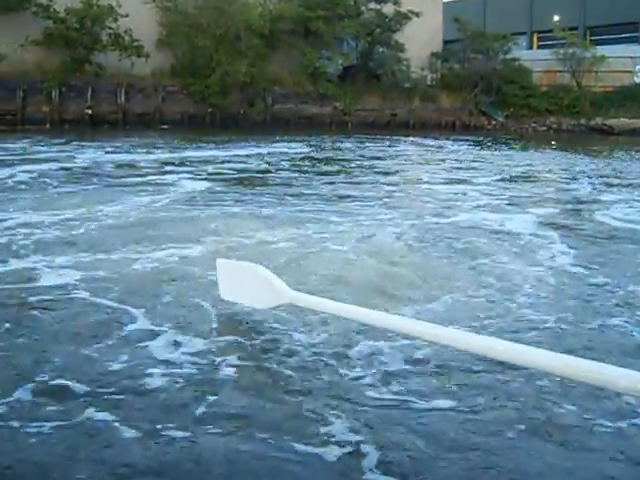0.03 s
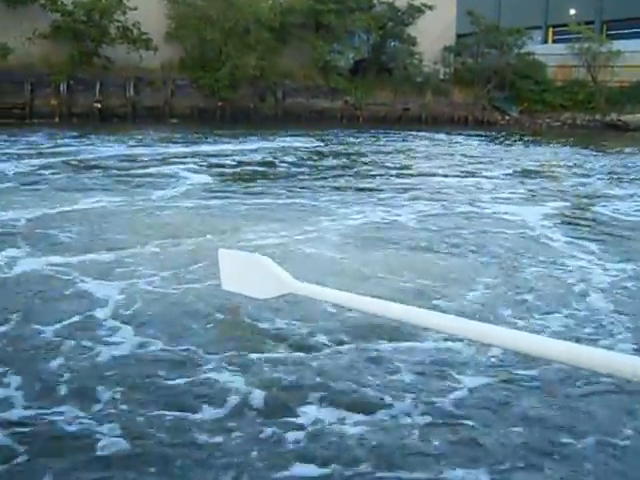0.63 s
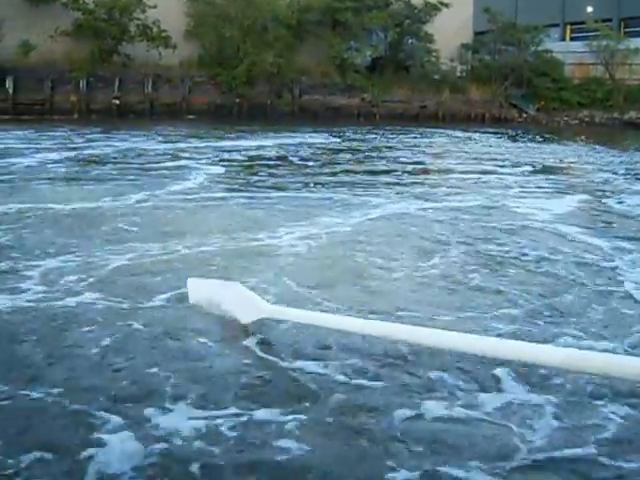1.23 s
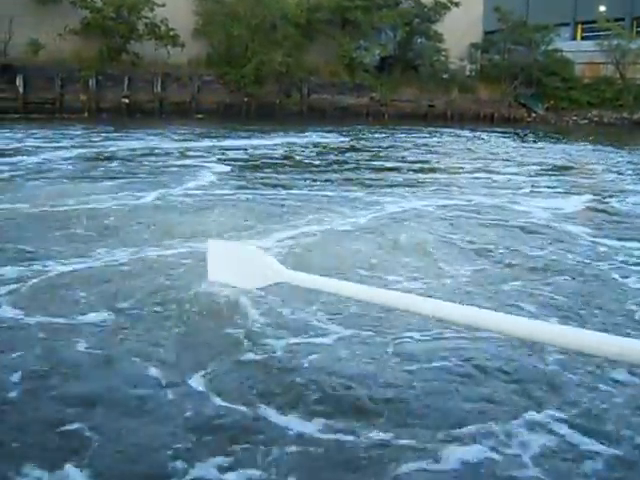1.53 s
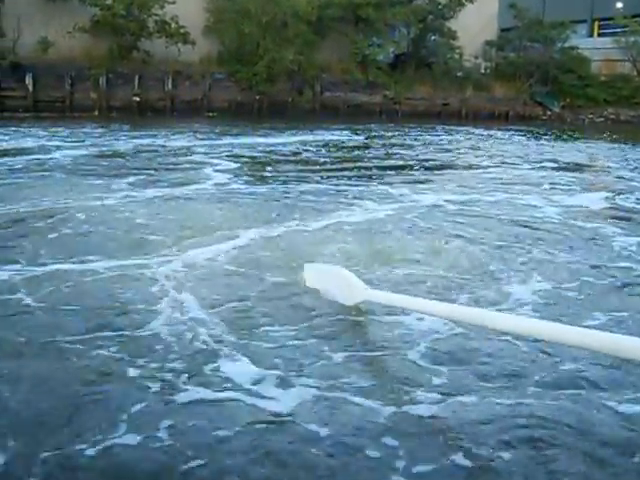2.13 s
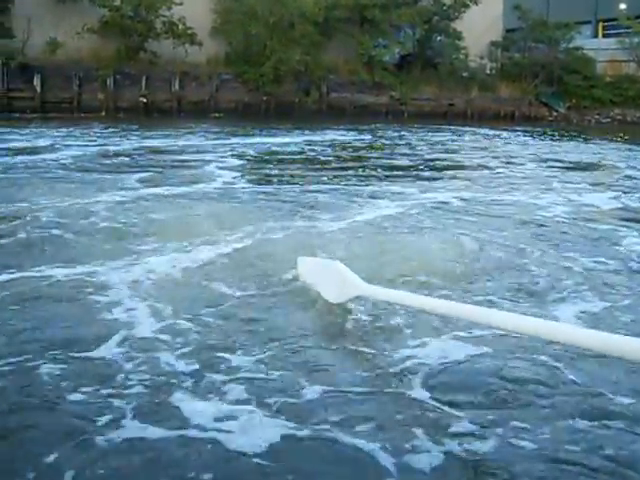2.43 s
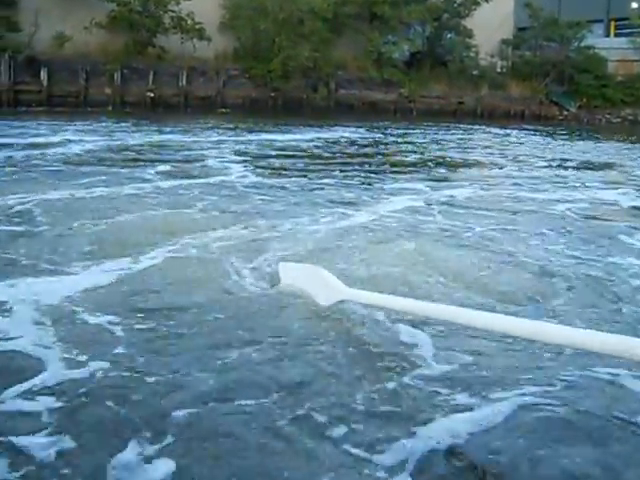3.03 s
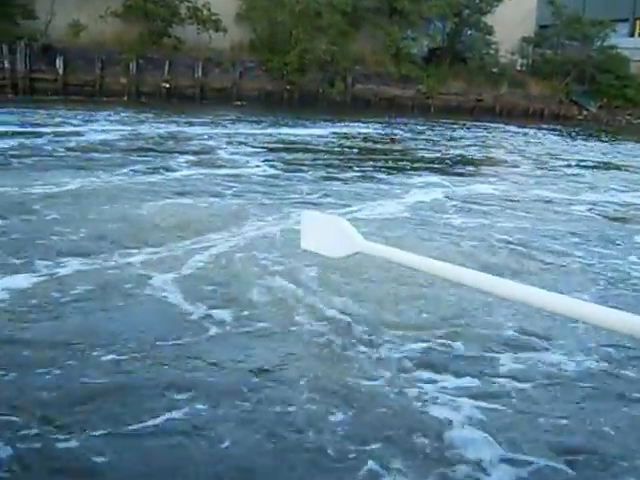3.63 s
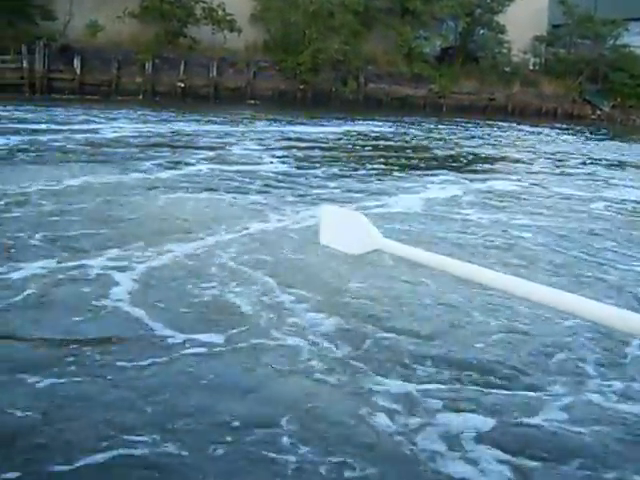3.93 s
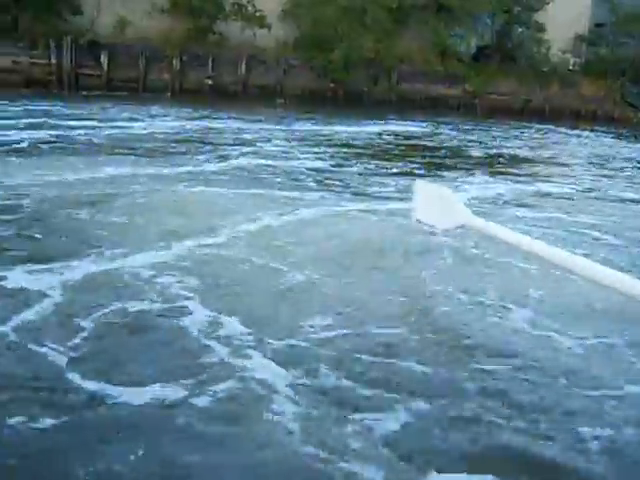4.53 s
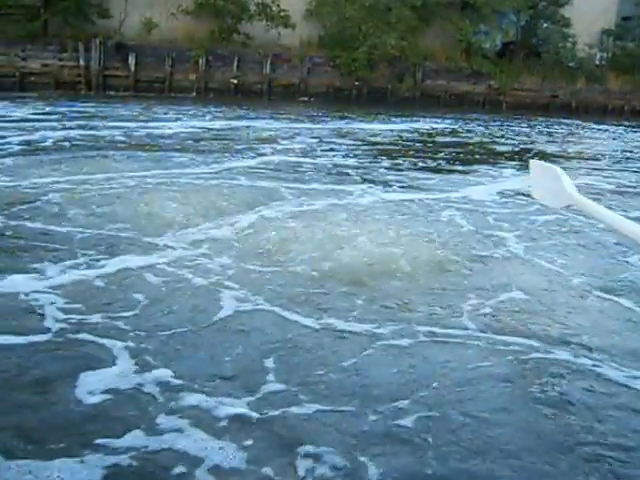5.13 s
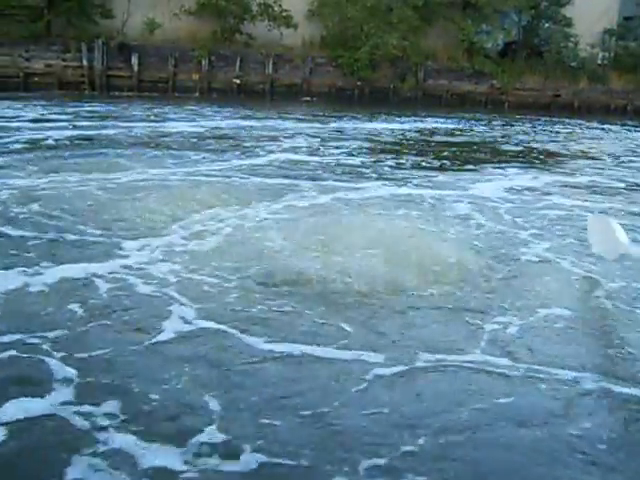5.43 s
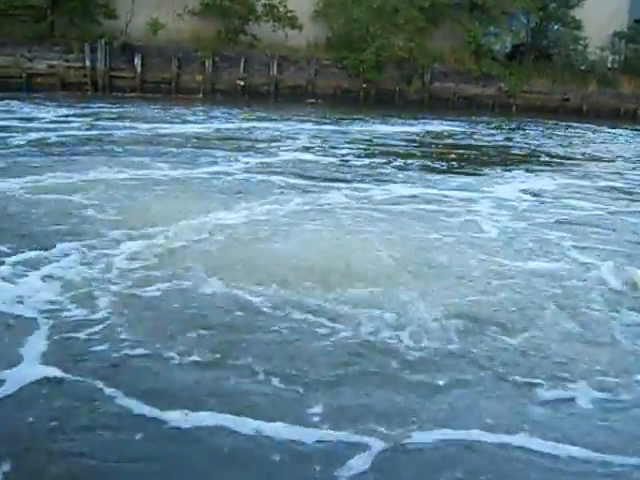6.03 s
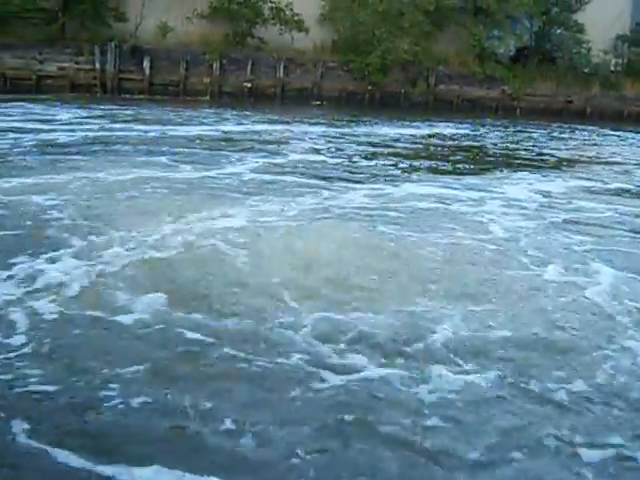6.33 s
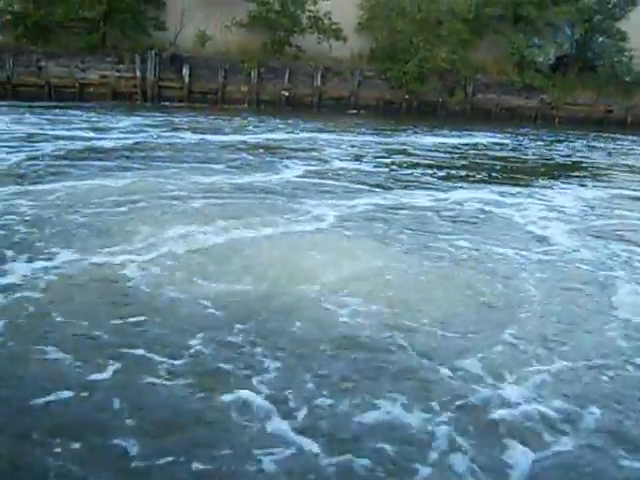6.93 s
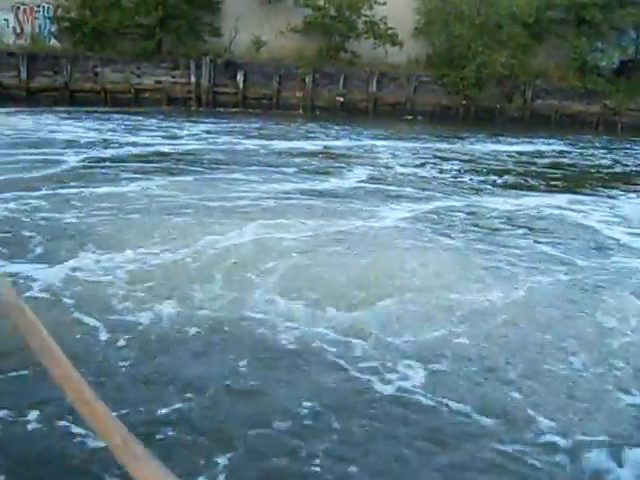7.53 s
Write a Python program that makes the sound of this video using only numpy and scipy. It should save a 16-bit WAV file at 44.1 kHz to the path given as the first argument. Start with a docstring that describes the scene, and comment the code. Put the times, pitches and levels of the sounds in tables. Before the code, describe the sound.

Surging, fizzing water with small drips, a few creaks of an oar rubbing a hull, and distant droning motors.

```python
"""A creek, beside a small boat: an aerator boils up in a surging wash of ringing bubbles, with fizz
and near drops. A pole held out over the water rubs on the boat in stick and slip; each release
rings the hard pole and the hollow hull, so the strokes squeak, creak and chirp.
Machinery drones in the distance over a deep rumble, and a far engine picks up speed towards the end."""
import sys
import numpy as np
from scipy import signal
from scipy.fft import rfft, irfft
from scipy.io import wavfile

SR = 44100
rng = np.random.default_rng(int(sys.argv[2]) if len(sys.argv) > 2 else 0)


def master(y):
    """Save y as 16-bit WAV."""
    cut = np.clip(np.atleast_2d(y).T, -1, 1)
    pcm = np.round(cut * 32767)  # scale
    wavfile.write(sys.argv[1], SR, pcm.astype(np.int16))


N = 343539
TIME = np.arange(N) / SR

# Table levels are relative: each layer adds its own trim.
# the upwelling swells and sinks about every two seconds: (time [s], churn [dB], spray [dB])
BOIL_LEVELS = [(0.0, -28.5, -34), (0.5, -25, -30), (1.05, -23.5, -31), (1.36, -26.5, -31),
               (1.9, -28.5, -33), (2.2, -25, -31), (2.75, -25, -26.5), (3.1, -20.5, -28),
               (3.35, -27, -30.5), (3.9, -27, -32.5), (4.8, -24.5, -30.5), (5.35, -21, -27),
               (5.85, -21.5, -25.5), (6.0, -26, -30.5), (6.25, -27, -31), (6.55, -31, -35.5),
               (7.52, -28, -30), (7.79, -22.5, -28.5)]
# close wavelets lift the boil: (time [s], half length [s], churn lift [dB], spray lift [dB])
WAVELETS = [(2.308, 0.083, 0.5, 2), (5.28, 0.035, 0.5, 3), (6.84, 0.043, 2, 3), (7.358, 0.072, 7.5, 5)]
# tone colour of the wash: (frequency [Hz], spectral density [dB])
WASH_SPECTRUM = [(100, -5), (160, -7.5), (250, -9), (400, -12), (700, -13.5), (1100, -19), (1900, -20.5),
                 (3000, -27.5), (5000, -29), (7000, -30.5), (8500, -45), (10000, -57.5)]
# a far motor, slowly sagging: (time [s], pitch [Hz], level [dB])
SAGGING_MOTOR = [(0.0, 63.2, -15.5), (0.5, 64.2, -20), (1.5, 64, -22), (1.85, 63.3, -27.5),
                 (2.8, 63.8, -27.5), (3.6, 62.2, -20), (4.0, 61.2, -26), (5.8, 61, -25.5), (6.6, 61.3, -36)]
# a second motor, hunting in speed: (time [s], pitch [Hz], level [dB])
HUNTING_MOTOR = [(0.0, 79, -27), (0.8, 80, -34), (1.6, 75, -29), (2.85, 74.5, -19), (3.25, 81.5, -30),
                 (4.15, 76, -24.5), (5.15, 74.7, -20.5), (6.0, 79, -23), (6.9, 76, -27.5), (7.79, 76, -32)]
# machine hums that swell as the boat drifts by:
# (pitch [Hz], level [dB], swell [dB], swell centre [s], swell half length [s])
MACHINE_HUMS = [(122.3, -29, 1.5, 4.9, 1.3), (166.5, -35, 8.5, 5.1, 1.2)]
# the hums duck near the end and come back: (time [s], gain [dB])
HUM_DIP = [(6.1, 0.5), (6.5, -6), (7.79, 0.5)]
# a far engine speeding up: (time [s], firing rate [Hz], level [dB])
ENGINE_REV = [(4.9, 35, -47), (5.5, 38, -38), (6.0, 45.48, -25), (6.2, 49.8, -34), (6.9, 56.94, -31.5),
              (7.08, 58.8, -19), (7.24, 58.86, -25), (7.55, 59.2, -15), (7.79, 62.6, -23.5)]
# tone colour of the rumble: (frequency [Hz], spectral density [dB])
RUMBLE_SPECTRUM = [(15, -15), (28, -4.5), (48, 4.5), (85, -4.5), (130, -21), (220, -35)]
# deep heaves of the water: (time [s], half length [s], level [dB])
WATER_HEAVES = [(2.472, 0.069, -23), (5.974, 0.15, -21.5)]
# strokes of the pole along the boat:
# (start [s], length [s], slip rate before drag [1/s], pole level [dB], boat level [dB])
POLE_STROKES = [(0.846, 0.05, 142, -19.5, -25), (0.9626, .281, 140, -18, -27),
                (5.873, 0.023, 93, -22.5, -26), (6.238, 0.088, 160, -46, -31.5),
                (6.354, 0.026, 125, -45, -30), (7.262, .05, 105, -50, -27), (7.31, 0.097, 118, -35, -25.5)]
# the squeal follows the changing grip: (time [s], pitch [Hz])
SQUEAL_PITCH = [(.89, 3200), (.963, 3300), (1.04, 4300), (1.068, 3200), (1.095, 4200), (1.11, 2400),
                (1.14, 2250), (1.174, 2800), (1.186, 4800), (1.235, 5600)]
# modes of the hard, bright pole: (frequency [Hz], bandwidth [Hz], gain [dB])
POLE_MODES = [(330, 230, 1.5), (696, 470, -4), (2130, 390, -8.5), (2800, 170, 3), (3410, 92, 0),
              (3620, 130, 5.5), (3760, 150, -2), (4180, 78, 9), (4570, 79, -15), (4600, 107, 7.5),
              (5220, 73, 5), (5380, 65, 1.5), (6500, 620, 9), (6587, 385, 11.5), (7270, 340, -1.5),
              (8900, 460, -10)]
# modes of the boat's hollow side: (frequency [Hz], bandwidth [Hz], gain [dB])
BOAT_MODES = [(352, 62, -1.5), (480, 53, -15), (826, 29, 11.5), (1245, 38, 8), (1400, 93, 3),
              (1886, 70, 4.5), (2250, 70, 2.5), (2767, 110, 3.5), (3090, 97, -1), (3510, 53, -2),
              (3840, 81, -0.5), (5243, 86, 4.5), (5970, 120, 1), (6160, 210, -5)]
# foreground drops and bursting bubbles: (time [s], level [dB], pitch [Hz], ring [cycles])
NEAR_DROPS = [(1.329, -17.5, 2820, 75), (1.4575, -18, 2840, 75), (1.802, -17.5, 2530, 75),
              (2.23, -13.5, 4100, 60), (2.257, -11, 3910, 60), (2.269, -8, 2450, 75),
              (2.352, -13.5, 4490, 75), (2.6247, -12, 2490, 75), (2.7204, -12.5, 2460, 75),
              (2.783, -10, 2470, 75), (2.9136, -5.5, 2050, 49), (3.2477, -12, 3600, 90),
              (3.3123, -19, 4000, 150), (3.3667, -16, 2820, 75), (4.6422, -17.5, 4000, 86),
              (4.917, -19.5, 3640, 75), (5.2817, -15, 2730, 520), (5.366, -15, 3840, 110),
              (5.615, -11.5, 3950, 94), (5.628, -10, 5400, 83), (5.8173, -14, 3000, 75),
              (7.138, -16.5, 2680, 68)]
# creaks, each a run of evenly spaced slips: (start [s], slips [count], gap [s],
# first level [dB], last level [dB], low knock offset [dB], top crack offset [dB])
CREAK_RUNS = [(3.0028, 1, .0135, -4, 10, -13.5, -14), (3.0402, 5, 0.014, -10, -1.5, -15, -9.5),
              (3.1079, 2, .0055, -6, -15, -23, -9), (3.1335, 3, .006, -10, -15, -14, -8),
              (3.1592, 3, .014, -7, -10, -18, -10.5), (6.2394, 3, 0.0095, -12, -12.5, -11, -31),
              (6.2934, 4, .0087, -17, -22, -0.5, -31), (6.348, 3, 0.0098, -5.5, -24, -17, -24),
              (6.4243, 3, .012, -6, -11.5, -15.5, -30), (7.677, 2, .0212, -12, -14, -6, -17)]
# long slips that glide: (start [s], length [s], start pitch [Hz], end pitch [Hz], level [dB])
GLIDING_SLIPS = [(5.880, .016, 3600, 6200, -23), (6.2235, .0075, 7700, 5600, -9.5),
                 (6.2305, .006, 5200, 2600, -9.5)]


def from_db(db):
    """Decibels to gain."""
    return 10 ** (np.asarray(db) / 20)


def unit_rms(x):
    """Scale to unit power."""
    return x / np.sqrt(np.mean(x ** 2) + 1e-20)


def automation(rows):
    """One curve per value column, ramping straight between time points."""
    times, *columns = np.transpose(rows)
    return [np.interp(TIME, times, column) for column in columns]


def gain_at(spectrum, hz):
    """Gain of a spectrum, read on a log-frequency axis."""
    points_hz, points_db = np.transpose(spectrum)
    return from_db(np.interp(np.log(hz), np.log(points_hz), points_db))


def swell(s, half_s):
    """A smooth rise and fall of height 1 around time s."""
    return np.exp(-((TIME - s) / half_s) ** 2)


def drift(rate_hz):
    """Slow random modulation of spread 1."""
    hop, settle = 40, 2000
    r = np.exp(-2 * np.pi * rate_hz * hop / SR)
    slow = signal.lfilter([1], [1, -2 * r, r * r], rng.standard_normal(N // hop + settle + 2))[settle:]
    return np.interp(np.arange(N) / hop, np.arange(len(slow)), unit_rms(slow))


def butter(x, hz, kind, order=2):
    """Butterworth filter."""
    return signal.sosfilt(signal.butter(order, hz, kind, fs=SR, output="sos"), x + 1e-18)


def resonance(x, hz, width_hz):
    """Two-pole resonance with gain 1 at its peak."""
    r = np.exp(-np.pi * width_hz / SR)
    feedback = [1, -2 * r * np.cos(2 * np.pi * hz / SR), r * r]
    return signal.lfilter(np.array([1, 0, -1]) * (1 - r * r) / 2, feedback, x + 1e-18)


def add(out, s, sound):
    """Mix a short sound in at time s."""
    at = int(np.clip(s * SR, 0, N - 1))
    out[at:at + len(sound)] += sound[:N - at]


def bubble(hz, cycles, rise):
    """A bubble rings down by 60 dB, its pitch rising as it nears the surface."""
    age = np.arange(int(cycles / hz * SR) + 2) / SR * hz / cycles
    return np.sin(2 * np.pi * cycles * (age + rise * age ** 2 / 2)) * from_db(-60 * age)


def bubble_cloud(hz, per_s, size_db=4.0):
    """Bubbles on four neighbouring semitones are born at random, mostly small and a few large."""
    born = np.flatnonzero(rng.random(N) < per_s / SR)
    sizes = from_db(size_db * np.minimum(rng.exponential(1, len(born)), 4))
    sizes *= rng.choice([-1, 1], len(born))
    notes = rng.integers(0, 4, len(born))
    out = np.zeros(N)
    for k, pitch in enumerate(hz * 2 ** (np.arange(-2, 2) / 12)):
        triggers = np.bincount(born[notes == k], sizes[notes == k], N)
        out += signal.oaconvolve(triggers, bubble(pitch, cycles=20, rise=0.11))[:N]
    return unit_rms(out)


def boil(churn_db, spray_db, bubbles_db=-3.0, fizz_follow=0.98):
    """The water bed: third-octave bands of near bubbles over a smooth far wash."""
    centres = 100 * 2 ** (np.arange(21) / 3)
    shares = gain_at(WASH_SPECTRUM, centres) * np.sqrt(centres)
    shares /= np.linalg.norm(shares[(centres > 220) & (centres < 1100)])
    calm_db, spray_surge_db = np.median(churn_db), spray_db - np.median(spray_db)
    white, lapping_db = rng.standard_normal((2, N)), .5 * drift(2.4)
    out = np.zeros(N)
    for k, (hz, share) in enumerate(zip(centres, shares)):
        # low bands ride the churn; the small bubbles higher up ride the spray
        small, tiny = np.clip(np.log2([hz / 750, hz / 2000]), 0, 1)
        spray_follow = small * (1 - tiny * (1 - fizz_follow))
        surge_db = (1 - small) * (churn_db - calm_db) + spray_follow * spray_surge_db
        wash = unit_rms(butter(white[k % 2], [hz / 2 ** (1 / 6), hz * 2 ** (1 / 6)], "band"))
        near = bubble_cloud(hz, per_s=260 * (hz / 1000) ** .3)
        mix = (wash + from_db(bubbles_db) * near) / np.hypot(1, from_db(bubbles_db))
        out += share * mix * from_db(calm_db + surge_db + lapping_db + drift(17))
    return out


def plops(churn_db, trim_db=-3.5, per_s=28, size_db=2.5):
    """Larger bubbles surface close by, each on its own note: the bigger, the deeper."""
    out = np.zeros(N)
    for when, strength, radius in rng.random((int(per_s * N / SR), 3)):
        db = size_db * min(-np.log(1 - strength), 3) - 4 * (1 - radius)
        add(out, when * N / SR, from_db(db) * bubble(2800 / 7 ** radius, cycles=38, rise=0.092))
    return out * from_db(churn_db + trim_db)


def snap(decay_s, grit):
    """A sharp transient with a short gritty tail."""
    age = TIME[:SR // 60]
    return 4 * (age == 0) + grit * rng.choice([-1, 1], len(age)) * np.exp(-age / decay_s)


def spatter(spray_db, trim_db=-6.5, per_s=55, size_db=5.0):
    """Foam bursts and tiny droplets land at random, louder when the boil throws more spray."""
    out = np.zeros(N)
    for when, strength, colour in rng.random((int(per_s * N / SR), 3)):
        hz = 700 * 9 ** colour
        db = size_db * min(-np.log(1 - strength), 3.5)
        tick = resonance(snap(decay_s=0.0017, grit=.6), hz, width_hz=hz * .7)
        add(out, when * N / SR, from_db(db) * tick)
    return out * from_db(spray_db + trim_db)


def drone(hz, db, waver):
    """A far tone that wavers in strength and phase on its way over the water."""
    phase = 2 * np.pi * np.cumsum(hz * np.ones(N)) / SR
    tone = (1 + waver * drift(5.6)) * np.sin(phase) + waver * drift(8.3) * np.cos(phase)
    return from_db(db) * unit_rms(tone)


def machinery():
    """Two distant motors wander in speed under hums of steady pitch."""
    hz, db = automation(SAGGING_MOTOR)
    out = drone(hz, db, waver=0.23)
    hz, db = automation(HUNTING_MOTOR)
    out += drone(hz, db + 0.5, waver=0.42)
    dip_db, = automation(HUM_DIP)
    for hz, db, swell_db, s, half_s in MACHINE_HUMS:
        out += drone(hz, db + dip_db + swell_db * swell(s, half_s), waver=0.34)
    return out


def rumble(bed_db=-29.5, unrest_db=2.0):
    """The low end: restless noise of the town and the rising air, with heaves of the water."""
    hz = np.fft.rfftfreq(N, 1 / SR) + 1
    noise = irfft(rfft(rng.standard_normal(N)) * gain_at(RUMBLE_SPECTRUM, hz), N)
    bed = from_db(bed_db + unrest_db * drift(3.4))
    heaves = sum(from_db(db) * swell(s, half_s) for s, half_s, db in WATER_HEAVES)
    return (bed + heaves) * unit_rms(butter(noise, 200, "low"))


def body(force, modes):
    """The modes of a body ring in parallel, alternating in polarity."""
    return sum((-1) ** k * from_db(db) * resonance(force, hz, width_hz)
               for k, (hz, width_hz, db) in enumerate(modes))


def rubbing(pole_db=7.5, boat_db=10.0, thud_db=-2, slip_s=0.0039, edge_s=0.0033, jitter=0.064, grit=0.19):
    """Quick stick and slip: each release jolts pole and boat and sets off a squeal."""
    on_pole, on_boat, squeal = np.zeros((3, N))
    for s, length_s, free_per_s, push_db, lean_db in POLE_STROKES:
        touching = np.clip(np.minimum(TIME - s, s + length_s - TIME) / edge_s + .5, 0, 1)
        # a stroke drags in its middle: the longer it lasts, the slower and softer it gets
        drag_s = length_s * np.sin(np.pi * np.clip((TIME - s) / length_s, 0, 1))
        per_s = free_per_s * (1 - .75 * drag_s)
        slips = np.cumsum((TIME > s) * per_s * (1 + jitter * drift(60))) / SR
        sliding = np.exp(-(slips % 1) / per_s / slip_s) * np.sqrt(2 / (per_s * slip_s))
        jolts = np.diff(np.floor(slips), prepend=0) * np.sqrt(SR / per_s)
        friction = touching * (grit * jolts + sliding * rng.standard_normal(N))
        on_pole += friction * from_db(push_db - 10 * drag_s)
        on_boat += friction * from_db(lean_db - 4 * drag_s)
        squeal += touching * from_db(push_db) * np.sqrt(sliding)
    squeal_hz, = automation(SQUEAL_PITCH)
    rasp = unit_rms(butter(rng.standard_normal(N), 330, "low"))
    squeal *= rasp * np.sin(2 * np.pi * np.cumsum(squeal_hz) / SR)
    boat = body(on_boat, BOAT_MODES) + from_db(thud_db) * resonance(on_boat, hz=450, width_hz=600)
    return from_db(pole_db) * body(on_pole, POLE_MODES) + from_db(boat_db) * boat + squeal


def drops(ring_db=-5.5, pocket_db=0.5):
    """Each drop is a brief splash, coloured by its air pocket, and the ring of the bubble it traps."""
    out = np.zeros(N)
    for s, db, hz, cycles in NEAR_DROPS:
        burst = snap(decay_s=0.0038, grit=0.75)
        splash = butter(burst, [hz / 1.95, hz * 1.53], "band")
        pocket = from_db(pocket_db) * resonance(burst, hz, width_hz=900)
        add(out, s, from_db(db) * (splash + pocket))
        add(out, s, from_db(db + ring_db) * bubble(hz, cycles, rise=.06))
    return out


def creaks(boat_db=5.5, knock_db=11.5, pole_db=17.0, slip_s=0.0019, grit=0.57, crossover_hz=2000):
    """Slow stick and slip: gritty releases knock the boat, and the sharpest crack in the pole too."""
    force, knock, on_pole = np.zeros((3, N))
    for start, count, gap_s, first_db, last_db, low_db, top_db in CREAK_RUNS:
        for k, db in enumerate(np.linspace(first_db, last_db, round(count))):
            s = start + k * gap_s
            release = from_db(db) * snap(slip_s, grit)
            add(force, s, release)
            add(knock, s, release * from_db(low_db + knock_db))
            add(on_pole, s, from_db(db + top_db + pole_db) * snap(slip_s, grit))
    on_boat = butter(knock, crossover_hz, "low") - butter(force, crossover_hz, "high")
    crack = body(butter(on_pole, 5600, "high"), POLE_MODES)
    return from_db(boat_db) * body(on_boat, BOAT_MODES) + crack


def far_engine(octave_db=-8, octave_cap_db=-39, waver=0.22):
    """An engine gathers speed: its firing tone climbs, with a faint octave on top."""
    hz, db = automation(ENGINE_REV)
    return drone(hz, db, waver) + drone(2 * hz, np.minimum(db + octave_db, octave_cap_db), waver)


def chirps(grit=0.55, overtone=0.24):
    """In a long slip the squeal glides as the grip changes, and pole and boat ring on."""
    out = np.zeros(N)
    for s, length_s, start_hz, end_hz, db in GLIDING_SLIPS:
        hz = np.linspace(start_hz, end_hz, int(length_s * SR))
        phase = 2 * np.pi * np.cumsum(hz) / SR
        tone = np.sin(phase) + overtone * np.sin(2 * phase)
        scrape = grit * butter(rng.standard_normal(len(hz)), [2500, 7000], "band")
        add(out, s, from_db(db) * signal.windows.tukey(len(hz), .25) * (tone + scrape))
    return out + body(out, POLE_MODES) + body(out, BOAT_MODES)


def scene():
    """The mono mix: water and pole up front, machines and rumble behind."""
    churn_db, spray_db = automation(BOIL_LEVELS)
    for s, half_s, churn_lift_db, spray_lift_db in WAVELETS:
        churn_db += churn_lift_db * swell(s, half_s)
        spray_db += spray_lift_db * swell(s, half_s)
    creek = boil(churn_db, spray_db) + plops(churn_db) + spatter(spray_db) + drops()
    pole = rubbing() + creaks() + chirps()
    return (creek + pole + machinery() + far_engine() + rumble())[None]


def record(dry):
    """A small microphone with a notch in the treble, limited headroom and a steep top."""
    notched = dry - .87 * resonance(dry, hz=7980, width_hz=750)
    limited = np.clip(butter(notched, 8900, "low", order=9), -.75, .75)
    return butter(limited, 9850, "low", order=30)


dry = scene()
out = record(dry)
master(out)
```